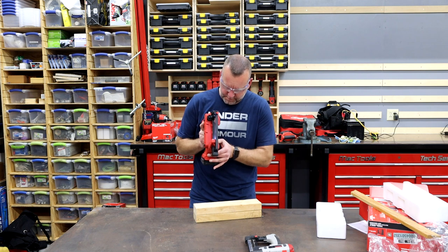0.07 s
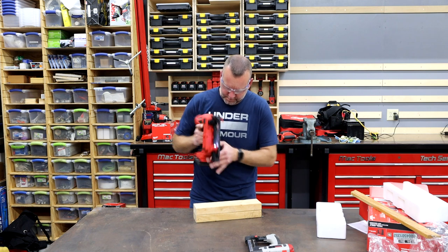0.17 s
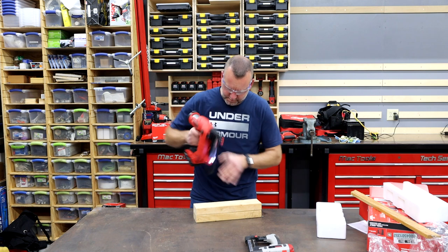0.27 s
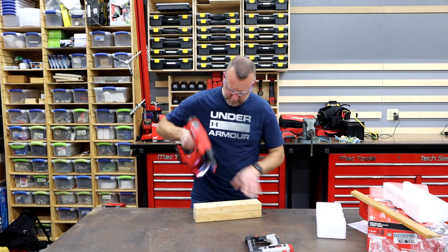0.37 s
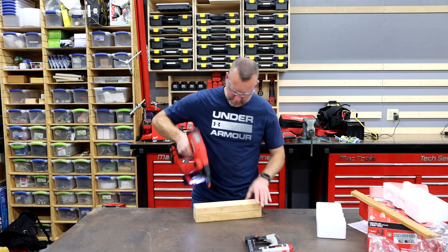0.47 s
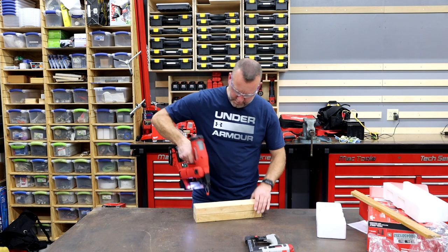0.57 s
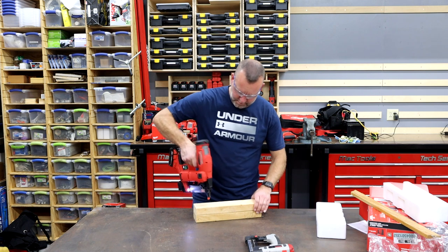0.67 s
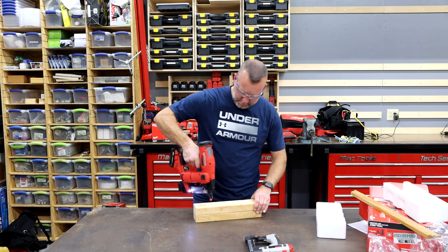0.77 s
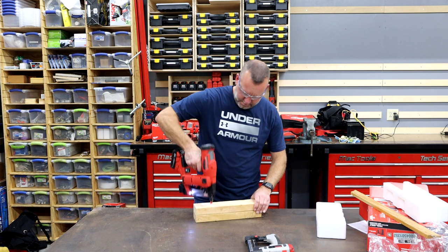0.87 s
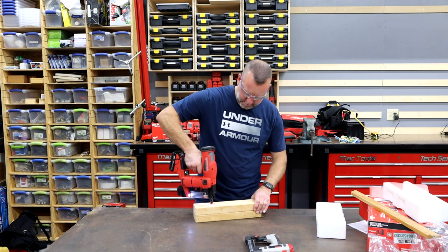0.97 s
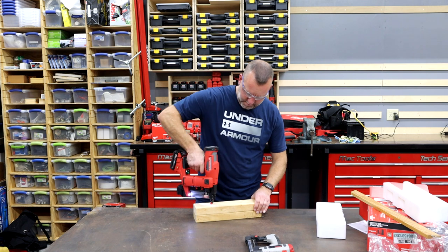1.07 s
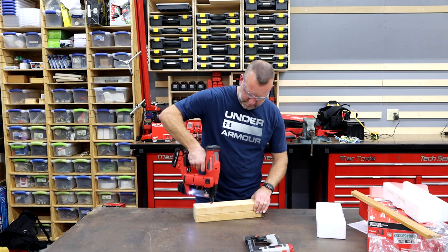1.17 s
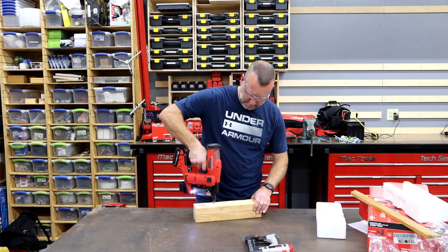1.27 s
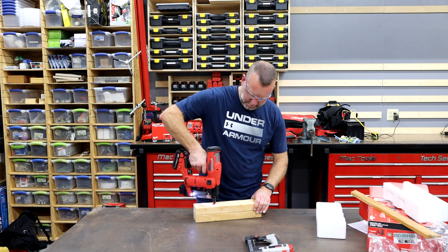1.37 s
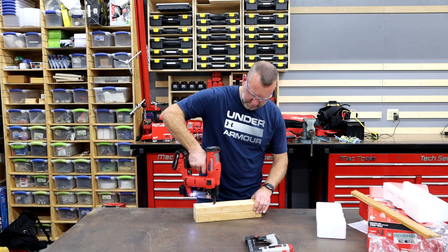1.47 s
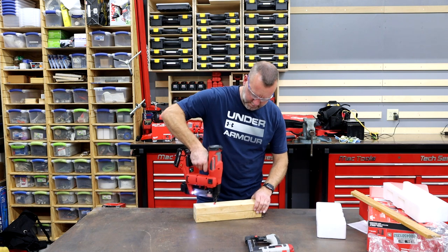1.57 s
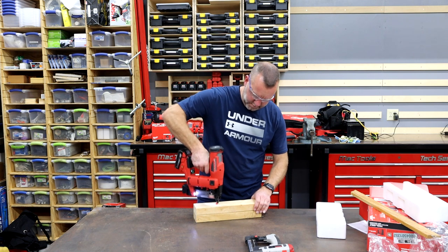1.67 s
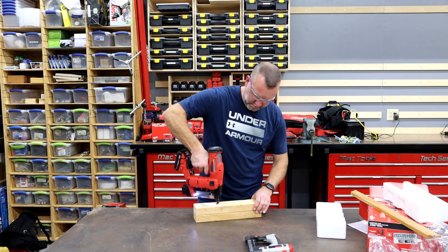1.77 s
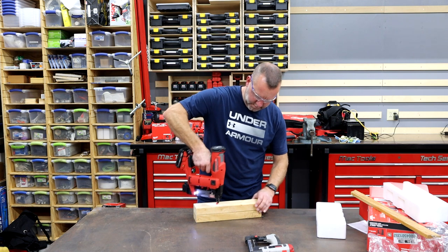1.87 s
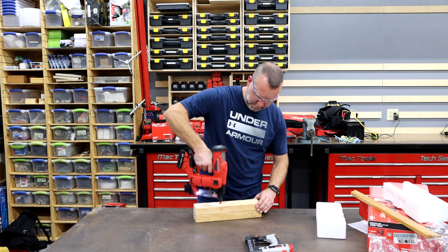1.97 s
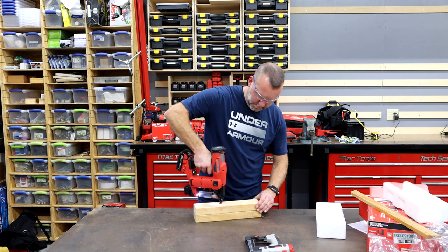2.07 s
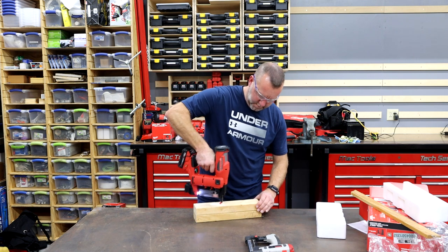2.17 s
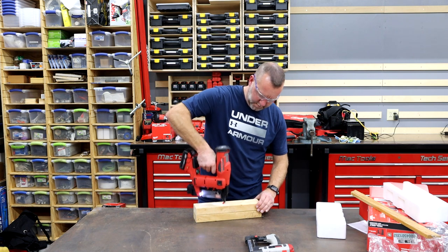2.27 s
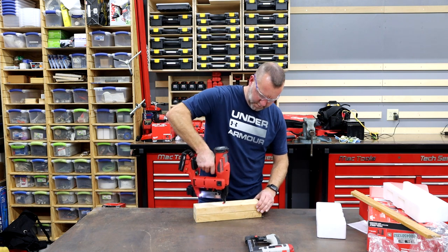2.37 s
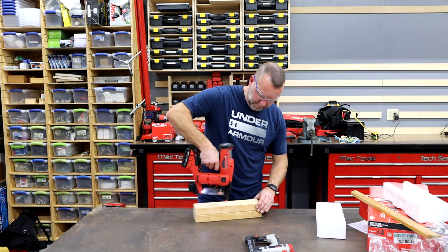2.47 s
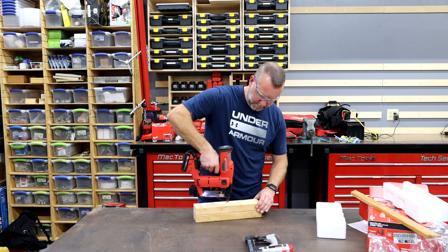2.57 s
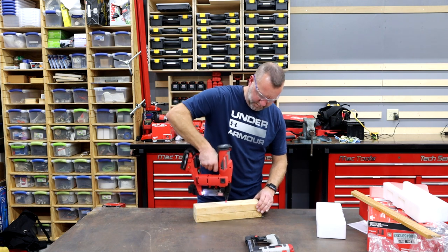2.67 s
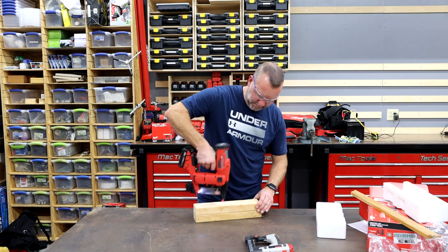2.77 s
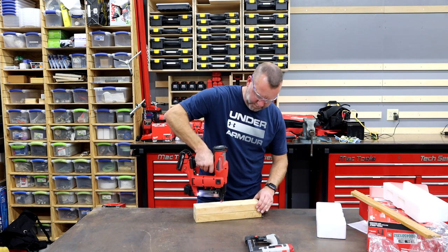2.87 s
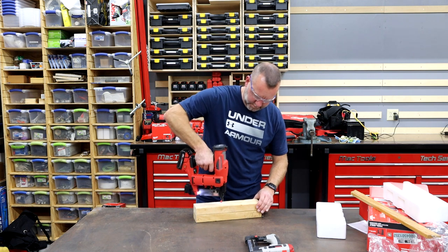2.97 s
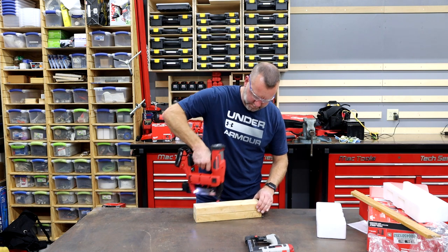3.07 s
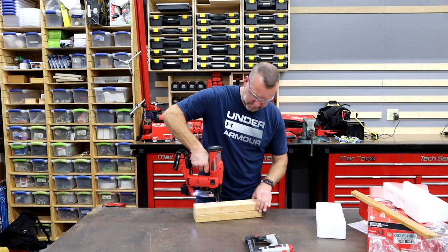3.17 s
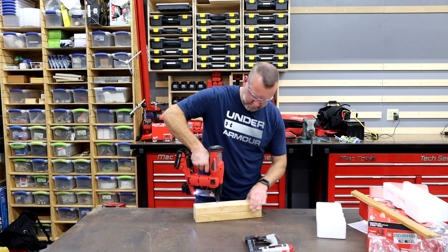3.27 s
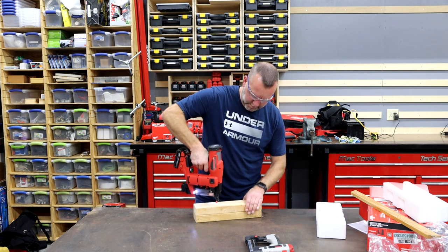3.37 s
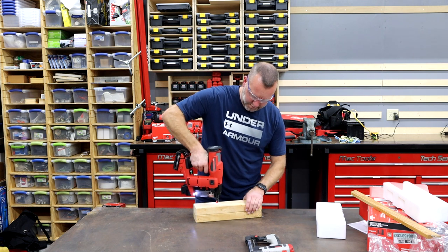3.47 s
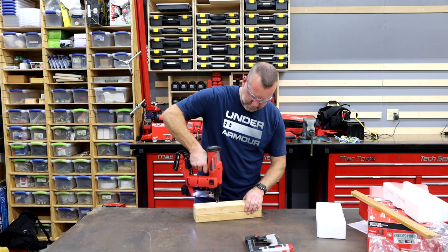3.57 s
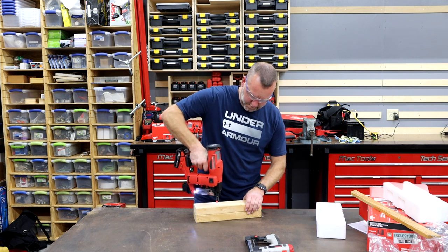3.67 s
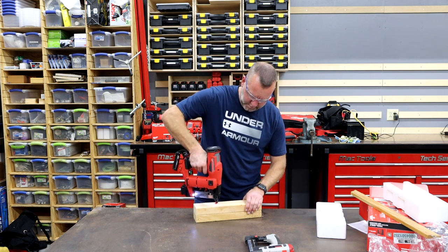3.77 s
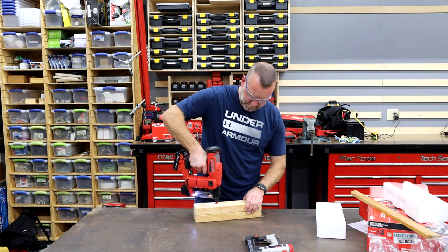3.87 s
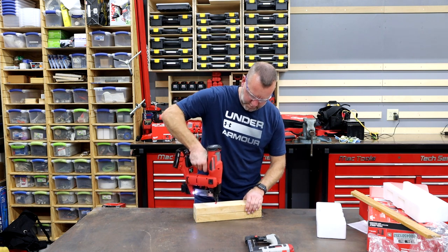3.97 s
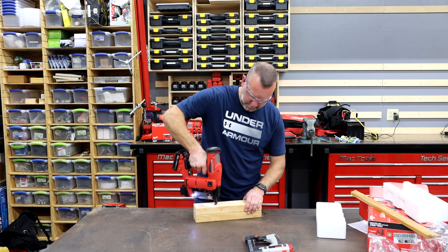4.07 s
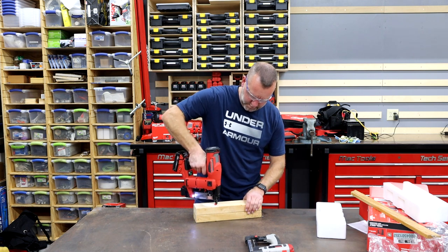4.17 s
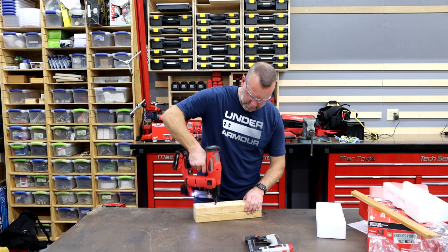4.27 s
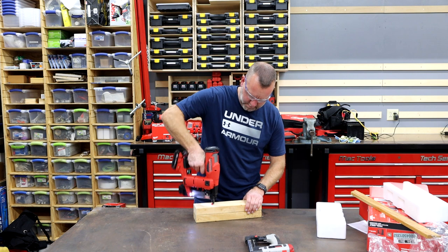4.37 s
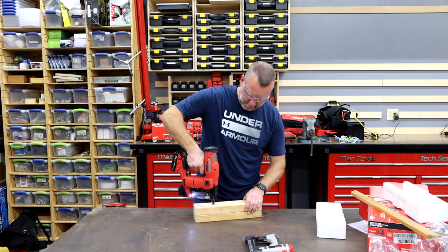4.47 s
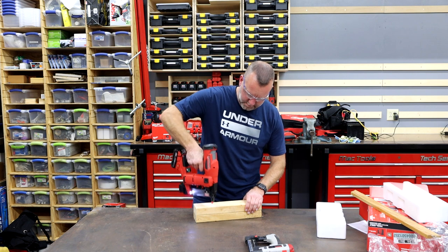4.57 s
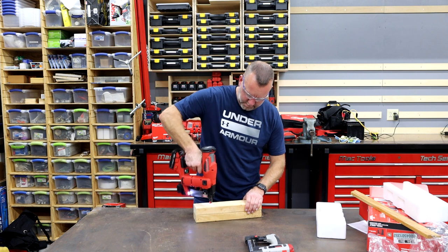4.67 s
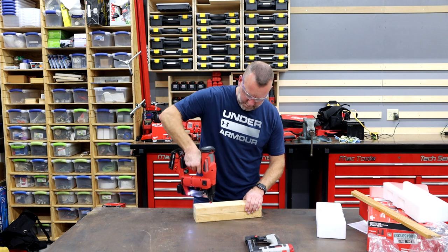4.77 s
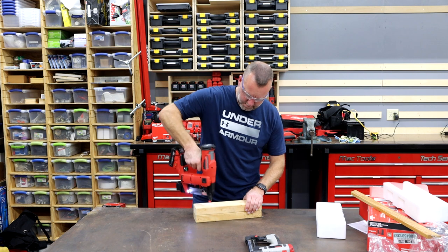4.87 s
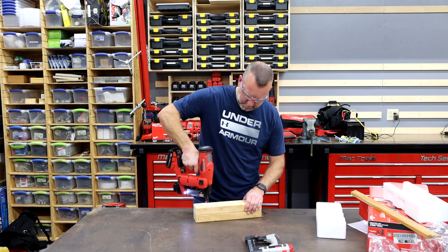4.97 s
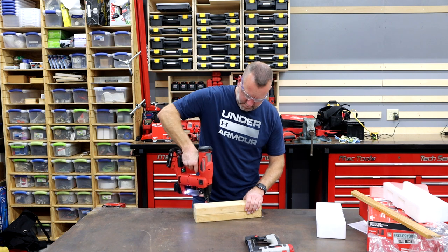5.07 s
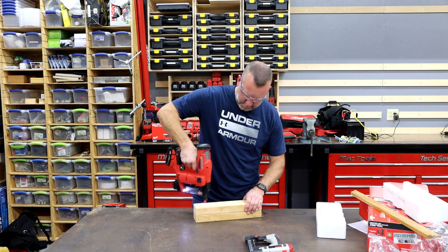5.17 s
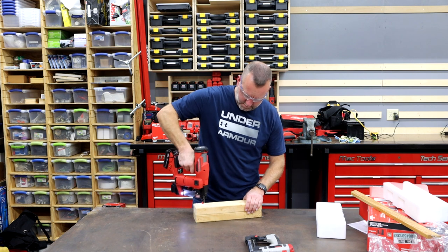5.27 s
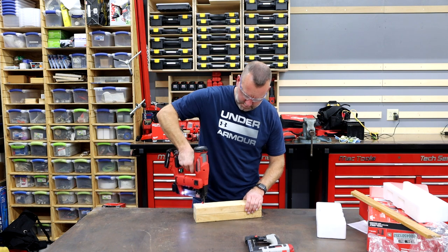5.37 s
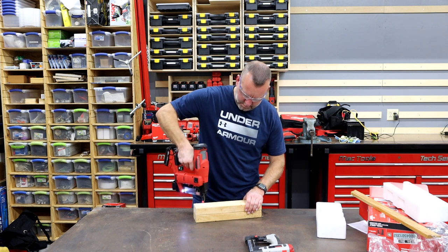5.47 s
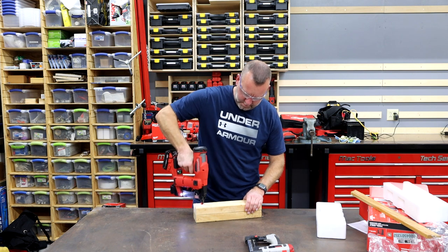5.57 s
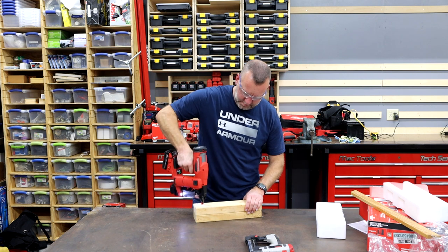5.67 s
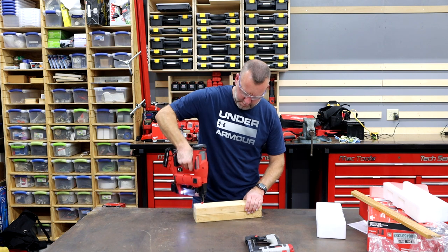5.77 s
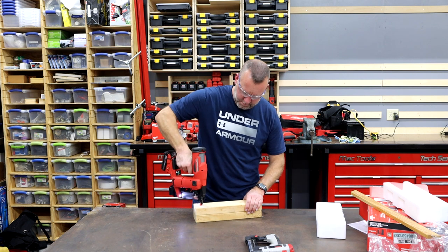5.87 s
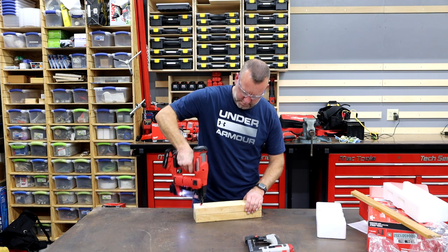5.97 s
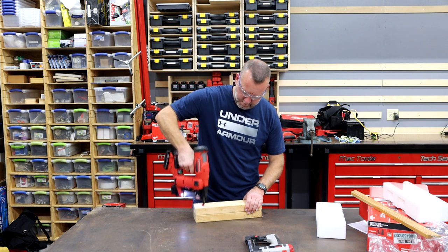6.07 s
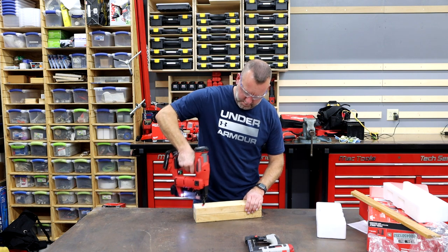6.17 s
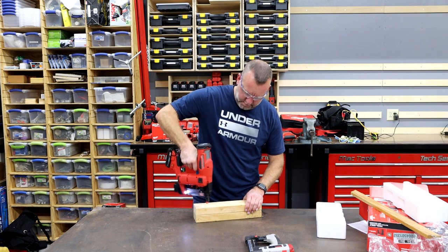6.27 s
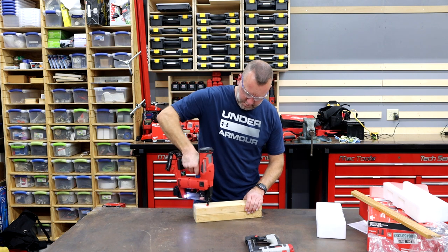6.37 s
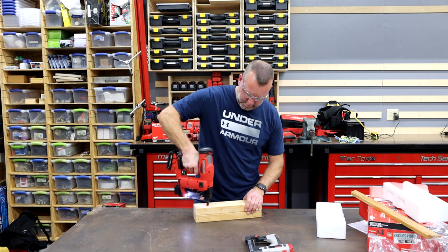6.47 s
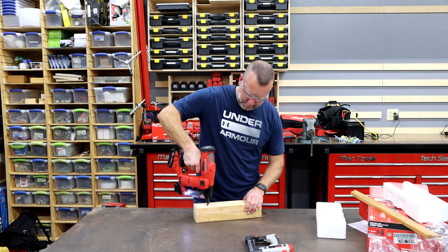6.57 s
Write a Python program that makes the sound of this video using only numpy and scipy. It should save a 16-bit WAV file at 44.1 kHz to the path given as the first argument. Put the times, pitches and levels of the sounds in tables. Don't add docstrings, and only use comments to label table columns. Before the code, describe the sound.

Quiet fumbling and a crisp double switch snap lead into a nail gun's rapid string. Each shot is a motor kick and cracking blow into wood, followed by a sagging gritty gear whine, metallic clack, and another short whine cut off abruptly. Early shots are louder and more spaced; later ones run evenly. Short bright room echoes surround the tool, and the recorder turns itself down through the first half.

```python
import sys
import numpy as np
from scipy import signal
from scipy.fft import rfft, irfft, next_fast_len
from scipy.io import wavfile
from scipy.ndimage import uniform_filter1d

SR = 44100
rng = np.random.default_rng(int(sys.argv[2]) if len(sys.argv) > 2 else 0)


def boost(x):
    u = np.asarray(x, float) / 20
    return 10 ** u


def unload_audio(sound):
    columns = np.transpose(np.atleast_2d(sound))
    steps = np.round(np.clip(columns, -1, 1) * 32767)
    wavfile.write(sys.argv[1], SR, steps.astype(np.int16))


N = 291501
TIME = np.arange(N) / SR

# (time [s], gain [dB])
RECORDER_GAIN = [(0, 23), (.996, 24), (1.004, 14), (1.7, 12.5), (2.3, 9), (3.1, 0), (3.7, -3), (6.61, -4.5)]
# (frequency [Hz], level [dB per Hz])
AIR_SPECTRUM = [(12, -35), (20, 3), (27, -18), (96, -11), (113, -18), (277, -15), (310, -14), (357, -13),
                (388, -15), (472, -18), (513, -17.5), (1290, -24), (16000, -33.5)]
# (frequency [Hz], level [dB rms])
LAMP_HUM = [(120, -84), (240, -89), (362, -82), (480, -82.5)]

# (time [s], peak [dB], brightness [dB], rustle after it [dB])
GRIP_SNAPS = [
    (0.2259, -49, -9, -12),
    (0.2544, -53, 0, -12),
    (0.2685, -52, 1, -13),
    (0.5744, -54, -8, -5),
]
# (time [s], peak [dB], brightness [dB], rustle after it [dB])
SWITCH_SNAPS = [
    (0.614, -48, -4, -15),
    (0.6212, -28, -4, -15),
    (0.6334, -37, 0, -16),
    (0.6544, -30, 2.5, -30),
    (0.6664, -40, 5, -25),
]
# (time [s], peak [dB], brightness [dB], rustle after it [dB])
TRIGGER_SNAPS = [
    (0.9969, -15, 0.013, -2.5),
    (1.4155, -18, -2, -1.5),
    (2.6424, -10.5, -5, -14),
]
# (frequency [Hz], level [dB per Hz])
GRIP_SPECTRUM = [(530, -42), (900, -10), (1650, -10), (1730, -8), (2710, -12), (4540, -5), (6560, -17),
                 (14000, -23)]
SWITCH_SPECTRUM = [(400, -43), (780, -5), (1300, 0), (2500, 3.5), (3500, -2), (5400, -11.5), (6800, -19),
                   (8600, -8), (10200, -24), (11500, -20), (16000, -28)]
TRIGGER_SPECTRUM = [(88, -53), (150, -15), (716, -3.5), (1790, -9.5), (2310, -9), (2810, -9), (3220, -6),
                    (5680, -13), (8230, -17.5), (13700, -17), (16000, -39)]
RUSTLE_T60_S = (.22, .16, .3)

# (time [s], blow [dB], thump in the block [dB], whine [dB])
SHOTS = [(1.1855, 0, 0, 4.5), (1.6075, -0.5, -.5, 4), (1.9643, 0, -0.5, 4.5), (2.2789, -1, -1, 2.5),
         (2.574, -0.5, -1.5, 1), (2.869, -1, -2, 0), (3.1651, -1.5, -0.5, 2), (3.46, -1, -2, 1),
         (3.7561, -2, -1.5, 2), (4.0517, -2, -1, 2.5), (4.356, -2, 0, 2), (4.6609, -2, -1.5, 2.5),
         (4.9577, -0.5, -1.5, 2), (5.254, -0.5, -3.5, 2.5), (5.5498, -1.1, -2.5, 2.5), (5.8456, 0, -4, 3),
         (6.1419, -1.4, -1.5, 2), (6.4383, -0.8, -2, 5)]

# (time from latch [s], level against latch [dB])
RACK_TICKS = [
    (-.053, -24),
    (-.039, -35),
    (-.021, -24.5),
    (.020, -28),
    (.039, -29),
    (.062, -25),
    (.082, -24),
    (.102, -27),
]
# (frequency [Hz], level [dB per Hz])
PIN_SPECTRUM = [(8000, -27), (10500, -2), (12800, 1), (14500, -7), (16000, -10.5)]
# (time from latch [s], level against latch [dB], brightness [dB])
CONTACTS = [
    (-.146, -13.5, -4),
    (-.107, -25, 0),
    (-.053, -19.5, 7.5),
    (-.040, -20, 7),
    (.013, -11, 7),
    (.021, -11.5, 3),
    (.037, -21.5, 8),
]
# (frequency [Hz], level [dB per Hz])
TICK_SPECTRUM = [(400, -55), (800, -21), (2000, -4.5), (3500, -1.5), (5000, 2), (6500, -4), (8500, 0.5),
                 (10000, -12), (16000, -14.5)]
# (frequency [Hz], level [dB per Hz])
CLACK_SPECTRUM = [(590, -21), (1000, -52), (1340, -13), (1850, -17), (2440, -4.5), (2740, 0.5), (4790, -1),
                  (6040, -9.5), (8070, 1.5), (9280, -2.5), (10100, -16.5), (12700, -8.5), (16000, -22)]
# (frequency [Hz], level [dB], time to fall 60 dB [s])
HOUSING_MODES = [(570, -11, .018), (700, -6, .022), (800, -2, .033), (890, -11, .016), (3000, -10, .012),
                 (3600, -9, .015), (5200, -11, .012), (7600, -9, .009), (9200, -8, .009)]

# (time from latch [s], level [dB])
GEAR_NOISE = [(-.162, -11), (-.143, 0), (-.122, 0.5), (-.11, 3), (-.082, 0), (.061, 1.5), (0.106, -2),
              (.117, -5), (.25, -13.5)]
# (frequency [Hz], level [dB per Hz])
GEAR_SPECTRUM = [(60, -52), (120, -55), (244, -17), (328, -15), (500, -3.5), (740, -7), (1800, -2.5),
                 (3600, -3), (5530, -1.5), (6500, -3), (7450, -4.5), (9300, -8.5), (10000, -15.5),
                 (15500, -30)]
# (multiple of tooth rate, on the lift [dB], on the rewind [dB])
TEETH = [(1, -13, -6), (1.2, -8, -5), (1.8, -4, -3), (2, 1, 2), (2.4, -5, -7), (3, 3, 2.5), (4, 0, 1),
         (5, -9, -8)]
# (start from latch [s], end [s], first rate [Hz], rate it heads for [Hz], settling [s])
LOADS = [
    (-.15, -.124, 1550, 2200, .03),
    (-.095, 0.001, 2261, 1735, .042),
    (.03, .105, 2352, 1670, .0255),
]
SWELL_S = (.002, .011, .007)
# (frequency [Hz], level [dB])
CASING = [(1750, 2), (2300, -1), (3400, -3), (3800, 2), (5100, -5), (5600, 1), (6900, -6), (7400, 1)]
# (frequency [Hz], width [Hz], level [dB])
SQUEAL_TONES = [(2890, 300, -10), (3520, 330, -0.5)]
# (time from latch [s], level [dB], rise [dB/s], fall [dB/s])
SQUEAL_TIMES = [
    (-.133, 5, 870, 1200),
    (0.104, -2.5, 850, 750),
]

# (frequency [Hz], level [dB per Hz])
SLAM_SPECTRUM = [(350, 1.5), (600, 5), (984, -1.5), (1490, 0), (2090, -9), (2340, -6), (2650, -1.5),
                 (3890, -6.5), (6550, -14.5), (8620, -10.5), (10700, -25), (13400, -18.5), (16000, -29)]
# (frequency [Hz], level [dB], time to fall 60 dB [s])
BLOCK_MODES = [(162, -17.5, 0.068), (197, -29, 0.032), (263, -16, 0.059), (290, -15, 0.076),
               (324, -11.5, 0.052), (387, -18.5, 0.037), (475, -16, 0.038), (525, -8.5, 0.056),
               (645, -42, 0.015), (744, -3.5, 0.062), (870, -15.5, 0.028), (1182, -5, 0.039),
               (1575, -11.5, 0.029), (1960, -5, 0.013)]

LATCH_DB = -4


def rms_one(x):
    return x / np.sqrt(np.mean(x ** 2) + 1e-20)


def at_hz(points, hz):
    point_hz, point_db = np.transpose(points)
    return np.interp(np.log(hz), np.log(point_hz), point_db)


def coloured(spectrum):
    hz = np.maximum(np.arange(N // 2 + 1) * SR / N, 1)
    white = rfft(rng.standard_normal(N))
    return rms_one(irfft(white * boost(at_hz(spectrum, hz)), N))


def above(x, hz):
    return signal.sosfilt(signal.butter(3, hz, "high", fs=SR, output="sos"), x)


def resonance(x, hz, width_hz):
    r = np.exp(-np.pi * width_hz / SR)
    feedback = [1, -2 * r * np.cos(2 * np.pi * hz / SR), r * r]
    return signal.lfilter(np.array([1, 0, -1]) * (1 - r * r) / 2, feedback, x)


def drift(rate_hz):
    r = np.exp(-2 * np.pi * rate_hz / SR)
    wander = signal.lfilter([1], [1, -2 * r, r * r], rng.standard_normal(N + SR))
    return rms_one(wander[SR:])


def train(times, db):
    out = np.full(N, 1e-18)
    at = np.clip((np.asarray(times) * SR).astype(int), 0, N - 1)
    np.add.at(out, at, boost(db))
    return out


def fade(clicks, t60):
    rise = np.exp(-1 / (.0004 * SR))
    decay = signal.lfilter([1], [1, -boost(-60 / (t60 * SR))], clicks)
    return signal.lfilter([1 - rise], [1, -rise], decay)


def rattle(times, db, bright_db, spectrum, t60):
    noise = coloured(spectrum)
    low = signal.sosfilt(signal.butter(2, 5000, fs=SR, output="sos"), noise)
    high = noise - low
    return low * fade(train(times, db), t60) + high * fade(train(times, db + bright_db), 0.59 * t60)


def struck(modes, times, db, spread_db):
    out = np.zeros(N)
    luck = rng.standard_normal((len(times), len(modes)))
    for k, (hz, level_db, t60) in enumerate(modes):
        r = boost(-60 / (t60 * SR))
        w = 2 * np.pi * hz / SR
        clicks = train(times, db + level_db + spread_db * luck[:, k])
        out += signal.lfilter([0, np.sin(w)], [1, -2 * r * np.cos(w), r * r], clicks)
    return out


def gain_db(s):
    return np.interp(s, *np.transpose(RECORDER_GAIN))


def room_tone():
    hiss = boost(-75) * coloured(AIR_SPECTRUM)
    hum = 0
    for hz, db in LAMP_HUM:
        hum = hum + boost(db - 3.5 + 2.1 * drift(5.8)) * np.sin(2 * np.pi * hz * TIME)
    return hiss + hum


def shop(x):
    t60_s, wall_cut_hz = 0.43, 9400
    size = next_fast_len(N + SR)
    turn = np.exp(-2j * np.pi * np.arange(size // 2 + 1) / size)
    dull = np.exp(-2 * np.pi * wall_cut_hz / SR)
    wall = (1 - dull) / (1 - dull * turn)
    out = 0
    lags = (rng.uniform(.011, .045, 12) * SR).astype(int)
    for k, lag in enumerate(lags):
        loop = boost(-60 * lag / SR / t60_s) * wall * turn ** lag
        out = out + (-1) ** k * loop / (1 - loop)
    for lag in (47, 113, 211):
        out = out * (turn ** lag - .6) / (1 - 0.53 * turn ** lag)
    return irfft(rfft(x, size) * out, size)[:N]


def fingers():
    snaps = (GRIP_SNAPS, SWITCH_SNAPS, TRIGGER_SNAPS)
    colours = (GRIP_SPECTRUM, SWITCH_SPECTRUM, TRIGGER_SPECTRUM)
    out = 0
    for events, colour, rustle_s in zip(snaps, colours, RUSTLE_T60_S):
        s, db, bright_db, rustle_db = np.transpose(events)
        snap = rattle(s, db + .5, bright_db + 2.5, colour, t60=0.015)
        rustle = rattle(s + 0.0018, db + rustle_db - 3.0, bright_db, colour, t60=rustle_s)
        out = out + snap + boost(3.0 * drift(150)) * rustle
    return out


def rack():
    latch_s, pins = np.array(SHOTS)[:, :1], np.array(RACK_TICKS)
    luck = rng.standard_normal((len(latch_s), len(pins), 2))
    at = latch_s + pins[:, 0] + 0.00083 * luck[..., 0]
    db = LATCH_DB + gain_db(latch_s) + pins[:, 1] + 2.0 * luck[..., 1] - 2.5
    return coloured(PIN_SPECTRUM) * fade(train(at.ravel(), db.ravel()), t60=0.014)


def kicks_and_halts():
    s = np.array(SHOTS)[:, 0]
    early = .4 ** np.arange(len(s))
    eased_db = 1.45 * gain_db(s)
    luck = rng.standard_normal((len(s), 2))
    kick_s = s - .1597 + .0023 * early ** 2
    kick_db = -15.5 + eased_db + 1.5 * luck[:, 0]
    halt_s = s + .1012 + 0.0142 * early
    halt_db = -18 + 5.5 * early + eased_db + 2.5 * luck[:, 1]
    kicks = np.c_[kick_s, kick_db, 2.5 + 0 * s]
    halts = np.c_[halt_s, halt_db, -4 + 0 * s]
    return np.r_[kicks, halts]


def mechanism():
    s = np.array(SHOTS)[:, 0]
    db = LATCH_DB + gain_db(s)
    clack = rattle(s, db - 0.5, 0 * db + 2.5, CLACK_SPECTRUM, t60=0.021)
    ring = above(struck(HOUSING_MODES, s + .0003, db - 4, spread_db=1.2), hz=530)

    offset, rel_db, bright_db = np.array(CONTACTS).T[:, None, :]
    luck = rng.standard_normal((len(s), len(CONTACTS), 2))
    contact_s = s[:, None] + offset + .0006 * luck[..., 0]
    contact_db = db[:, None] + rel_db + 1.2 * luck[..., 1]
    end_s, end_db, end_bright_db = kicks_and_halts().T
    at = np.r_[contact_s.ravel(), end_s]
    tick_db = np.r_[contact_db.ravel(), end_db - 3]
    tick_bright_db = np.r_[np.tile(bright_db[0], len(s)), end_bright_db]
    ticks = rattle(at, tick_db - 6.0, tick_bright_db, TICK_SPECTRUM, t60=0.03)
    tick_ring = above(struck(HOUSING_MODES, at, tick_db - 21, spread_db=9.0), hz=430)
    return clack + ring + ticks + tick_ring


def tooth_load(since):
    phase = np.searchsorted([-.11, .012], since)
    start, end, first_hz, last_hz, settle = np.array(LOADS)[phase].T
    fresh = .045 * np.exp(-((TIME - 1) / .85) ** 2 / 2)
    last_hz = last_hz * (1 + fresh)
    age = np.maximum(since - start, 0)
    hz = np.minimum(last_hz + (first_hz - last_hz) * np.exp(-age / settle), 2200)
    swell_db = -45 * np.exp(-age / np.array(SWELL_S)[phase])
    release_db = -6000 * np.maximum(since - end, 0)
    spin_up_db = -3.5 * (phase == 0)
    return hz, -7.5 + swell_db + release_db + spin_up_db, phase == 2


def motor():
    shots, stroke = np.array(SHOTS), np.array(GEAR_NOISE)
    shot = np.searchsorted(shots[:, 0] + stroke[0, 0], TIME) - 1
    running = shot >= 0
    shot = np.maximum(shot, 0)
    since = TIME - shots[shot, 0]
    level = running * boost(gain_db(TIME) - 29.5)

    hz, whine_db, rewind = tooth_load(since)
    speed = 1 + .0035 * drift(120)
    turns = 2 * np.pi * np.cumsum(hz * speed) / SR
    whine = 0
    for k, lift_db, back_db in TEETH:
        tone_db = np.where(rewind, back_db, lift_db) + at_hz(CASING, k * hz) + 2.2 * drift(74)
        whine = whine + boost(tone_db) * np.sin(k * turns)
    whine = boost(whine_db + shots[shot, 3]) * whine

    grit = boost(1.3 * drift(170))
    gears = boost(np.interp(since, *stroke.T)) * grit * coloured(GEAR_SPECTRUM)

    squeal_db = -31
    for s, db, rise, fall in SQUEAL_TIMES:
        peak_db = db + np.minimum(rise * (since - s), fall * (s - since))
        squeal_db = np.maximum(squeal_db, peak_db)
    white = rng.standard_normal(N)
    squeal = 0
    for tone_hz, width, db in SQUEAL_TONES:
        squeal = squeal + boost(db) * resonance(resonance(white, tone_hz, width), tone_hz, width)
    return level * (gears + whine + boost(squeal_db) * rms_one(squeal))


def driver():
    latch_s, db, thump_db, _ = np.transpose(SHOTS)
    s = latch_s - .1249
    bright_db = -0.3
    db = db - 0.2 + gain_db(s)
    scrape = rattle(s, db - 17.0, bright_db + 1.0, SLAM_SPECTRUM, t60=0.045)
    scrape = scrape + rattle(s + 0.00305, db - 12, bright_db + 11.0, SLAM_SPECTRUM, t60=0.077)
    slam = rattle(s + 0.00438, db - 2.0, bright_db, SLAM_SPECTRUM, t60=0.017)
    slam = slam + rattle(s + 0.011, db - 22.0, bright_db, SLAM_SPECTRUM, t60=0.37)
    block_db = db + thump_db
    boom = struck(BLOCK_MODES, s + 0.004838, block_db - 4.0, spread_db=1.5)
    rebound_s = np.r_[s + .0095, s + .02]
    rebound_db = np.r_[block_db - 11, block_db - 17]
    rebound = struck(BLOCK_MODES, rebound_s, rebound_db, spread_db=0.5)
    return scrape + above(slam, hz=810) - boom - rebound


def scene():
    room = boost(gain_db(TIME) - 16) * room_tone()
    tool = fingers() + rack() + mechanism() + motor() + driver()
    tool = above(tool, 167)
    echo = shop(above(tool, 113))
    return (tool + boost(-22.0) * echo + room)[None]


def roll_off(x):
    return signal.sosfilt(signal.butter(12, 16790, fs=SR, output="sos"), x)


def record(dry):
    level_db = 10 * np.log10(uniform_filter1d(dry ** 2, size=96) + 1e-12)
    ramp = 110 * TIME
    held_db = np.maximum.accumulate(level_db + ramp, axis=1) - ramp
    over_db = np.maximum(held_db + 7.5, 0)
    duck_db = signal.lfilter([.03], [1, -.97], over_db)
    x = dry * boost(-.8 * duck_db)
    x = x + 0.18 * x ** 4 / (1 + x ** 4)
    x = x / (1 + np.abs(x) ** 4) ** .25
    top_cut = signal.ellip(6, .5, 32, 15750, fs=SR, output="sos")
    x = .9 * signal.sosfilt(top_cut, x)
    return roll_off(x)


dry = scene()
out = record(dry)
unload_audio(out)
```